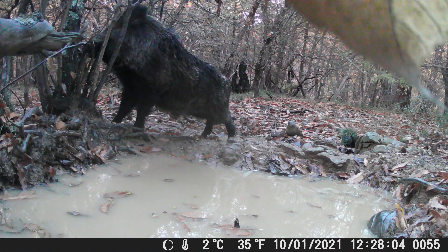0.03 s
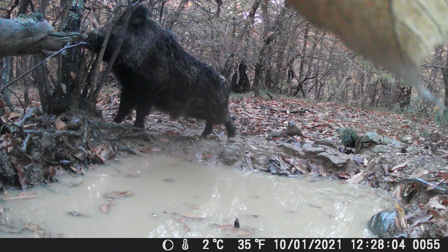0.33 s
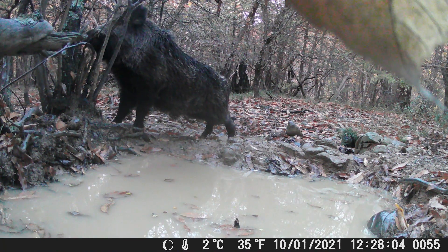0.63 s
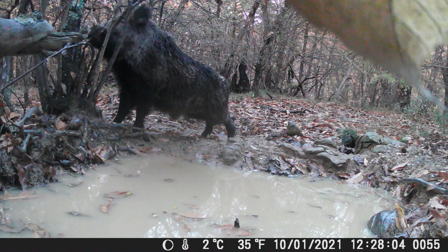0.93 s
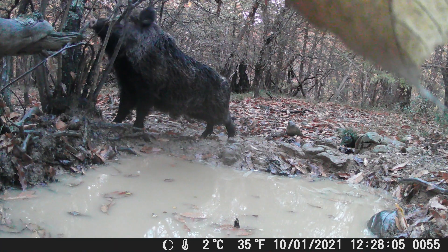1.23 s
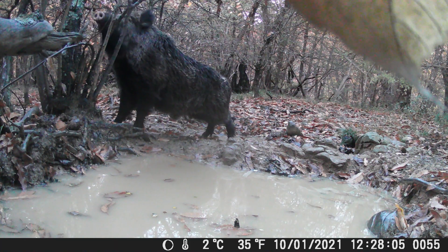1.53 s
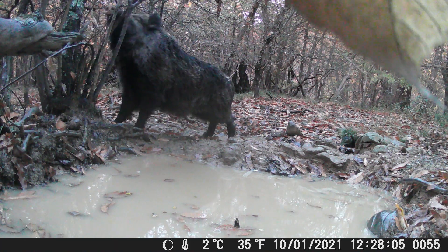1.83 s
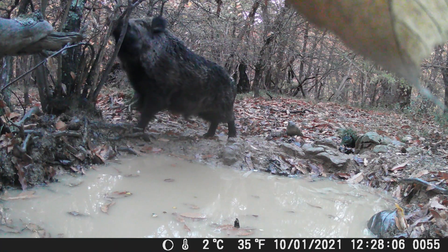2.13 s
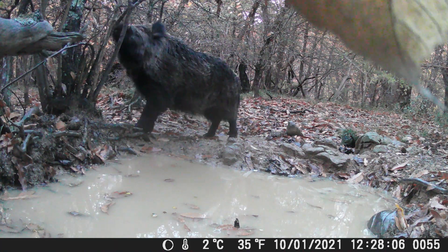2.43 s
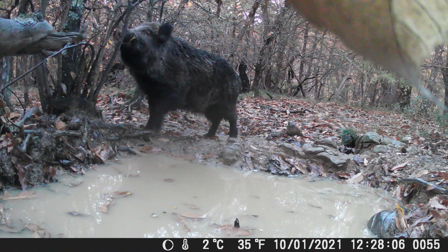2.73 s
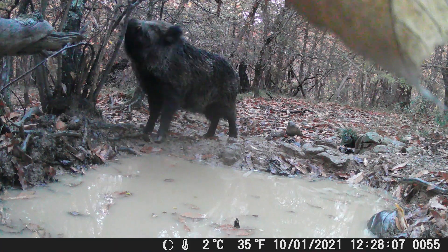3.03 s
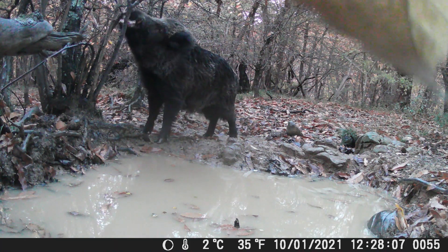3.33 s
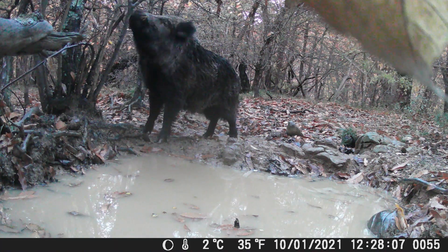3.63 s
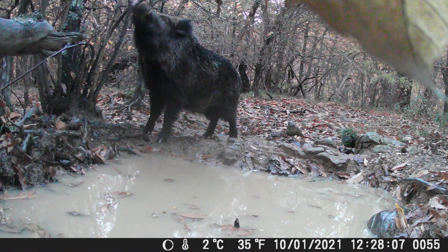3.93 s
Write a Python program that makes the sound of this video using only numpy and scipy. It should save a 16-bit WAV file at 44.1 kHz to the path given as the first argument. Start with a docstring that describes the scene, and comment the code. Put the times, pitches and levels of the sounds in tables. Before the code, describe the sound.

A hard, close knock with a brief rattle follows a boar's faint rustling and twig cracks.

```python
"""In a still wood, beside a muddy pool, a wild boar rubs its head on a trunk and shifts its feet.
Bristles catch on the bark and excite its resonances, dry leaves rustle as swarms of tiny impulses,
twigs crack and the animal's weight thuds, all over a faint hiss and rumble. Once, something snaps
hard against a mounted camera: the housing rings in its modes, rattles and shudders on its mount."""
import sys
import numpy as np
from scipy import signal
from scipy.fft import rfft, irfft
from scipy.io import wavfile
from scipy.ndimage import uniform_filter1d

SR = 44100
rng = np.random.default_rng(int(sys.argv[2]) if len(sys.argv) > 2 else 0)


def transcribe(signal):
    """Save signal, clipped to [-1, 1], as a 16-bit WAV file at the path in sys.argv[1]."""
    frames = np.atleast_2d(signal).T
    limited = np.clip(frames, -1, 1)
    pcm = np.round(limited * 32767).astype(np.int16)
    wavfile.write(sys.argv[1], SR, pcm)


N = 176400
T = np.arange(N) / SR
BUILD_CYCLES = 0.5  # time constant with which housing and mount start to vibrate

# Spectrum of crackling dry leaves. Each row: frequency in Hz, relative spectral density in dB.
LEAF_SPECTRUM = [(100, -0.5), (300, 8.5), (700, 1.5), (1500, 7), (2600, 6.5), (4000, 1), (7000, -4.5)]
# The snap on the housing, then softer bumps and rattles.
# Each row: start in seconds, peak of the contact pulse in dB, contact time in seconds.
CONTACTS = [(3.2401, -8.5, 0.00053), (3.2460, -12, 0.0038), (3.249, -30, 0.00097), (3.2520, -21, 0.0016),
            (3.273, -34.5, 0.0005), (3.2788, -26.5, 0.0036), (3.2851, -22, 0.0066), (3.315, -31.5, 0.00079),
            (3.359, -37, 0.0023), (3.452, -37, .002)]


def from_db(db):
    """Amplitude ratio of a level: 20 dB is a factor of ten."""
    return 10 ** (np.asarray(db) / 20)


def unit_rms(x):
    """Normalisation to a mean power of one."""
    return x / np.sqrt(np.mean(x ** 2) + 1e-20)


def at_hz(points, hz, column=1):
    """Interpolation of a table column on a logarithmic frequency axis."""
    table = np.array(points)
    return np.interp(np.log(hz + 1e-3), np.log(table[:, 0]), table[:, column])


def coloured(x, spectrum):
    """Filtering by multiplication in the frequency domain; the result has unit rms."""
    gain = from_db(at_hz(spectrum, np.fft.rfftfreq(N, 1 / SR)))
    return unit_rms(irfft(rfft(x) * gain, N))


def drift(per_s):
    """Slow random modulation: straight lines between Gaussian values."""
    return np.interp(T * per_s, np.arange(400), rng.standard_normal(400))


def resonate(x, hz, width_hz):
    """Forced response of a damped oscillator, with unit gain at resonance."""
    radius = np.exp(-np.pi * width_hz / SR)
    feedforward = np.array([1, 0, -1]) * (1 - radius ** 2) / 2
    feedback = [1, -2 * radius * np.cos(2 * np.pi * hz / SR), radius ** 2]
    return signal.lfilter(feedforward, feedback, x)


def lowpass(x, hz, order):
    """Maximally flat low-pass filtering: each order adds about 6 dB per octave of slope."""
    return signal.sosfilt(signal.butter(order, hz, fs=SR, output="sos"), x)


def decay(t60):
    """Exponential damping: the level falls 60 dB in t60 seconds."""
    return np.exp(-np.minimum(np.log(1000) * T / t60, 60))


def build_up(hz):
    """Onset transient: a low vibration takes longer to grow than a high one."""
    return 1 - np.exp(-T * hz / BUILD_CYCLES)


def swell(middle, half_length, db):
    """Gaussian envelope, at about half amplitude half_length seconds either side of its middle."""
    return from_db(db) * np.exp(-((T - middle) / half_length) ** 2 / np.sqrt(2))


def convolve(x, response):
    """Convolution: the output of a linear system with this impulse response."""
    return signal.fftconvolve(x, response)[:N]


def add(out, start_s, sound):
    """Superposition of a delayed sound on the mix."""
    start = int(start_s * SR)
    out[start:] += sound[:N - start]


def grains(per_s=2500, spread_db=3, max_spreads=5):
    """Shot noise: impulses of random size and sign at independent random times."""
    levels_db = spread_db * np.minimum(rng.exponential(1, N), max_spreads)
    sizes = from_db(levels_db) * rng.choice([-1, 1], N)
    return sizes * (rng.random(N) < per_s / SR)


def air():
    """Noise floor: still air and microphone hiss as Gaussian noise, strongest in the bass."""
    # Each row: frequency in Hz, relative spectral density in dB.
    spectrum = [(15, 1), (30, -1), (55, -3), (110, -7.5), (180, -11.5), (290, -13.5), (480, -22),
                (900, -27), (1300, -26), (1900, -27), (2700, -26), (4000, -33.5), (5200, -33),
                (7000, -37.5)]
    level_db = -53.5 - 0.13 * drift(per_s=7.3)
    return from_db(level_db) * coloured(rng.standard_normal(N), spectrum)


def trunk_scatter(x):
    """Diffuse reflection: the trunks add a faint, short tail to the direct sound."""
    scatter = rng.standard_normal(N) * decay(t60=0.067)
    return x + from_db(-11.5) * convolve(x, scatter / np.linalg.norm(scatter))


def leaf_litter():
    """Sparse shot noise: single leaves tick throughout, in clumps made by a drifting level."""
    # Each row: frequency in Hz, relative spectral density in dB.
    spectrum = [(300, -17), (1200, -2), (2800, 2.5), (4000, -5.5), (7000, -7.5)]
    ticks = grains(per_s=150, max_spreads=3)
    level_db = -68 - 4 * drift(per_s=14)
    return from_db(level_db) * coloured(ticks, spectrum)


def leaf_rustles():
    """Dense shot noise: the clicks of dry leaves merge into a rustle as they stir and settle."""
    # Each row: middle in seconds, half length in seconds, level in dB.
    stirs = [(0.263, 0.031, -62.5), (0.458, 0.014, -60), (0.677, 0.039, -85), (1.63, 0.027, -67),
             (1.846, 0.14, -59), (2.092, 0.01, -56.5), (2.188, 0.013, -52), (2.652, 0.0082, -52),
             (2.718, 0.04, -58.5), (2.791, 0.031, -58), (3.046, 0.021, -55), (3.272, 0.01, -49),
             (3.316, 0.003, -46.5), (3.332, 0.003, -48), (3.347, .002, -54), (3.375, 0.0081, -52.5),
             (3.407, .008, -53.5), (3.455, 0.011, -53), (3.766, 0.013, -54.5), (3.877, 0.0073, -57)]
    return sum(swell(*row) for row in stirs) * coloured(grains(), LEAF_SPECTRUM)


def twig_cracks():
    """Brittle fracture: an impulse and a burst of splinters excite one damped mode of each twig."""
    # Each row: start in seconds, level in dB, mode frequency in Hz, 60 dB decay time in seconds.
    breaks = [(0.237, -49.5, 3080, 0.025), (0.272, -53, 1440, 0.017), (.453, -40.5, 1340, 0.009),
              (.622, -47.5, 840, 0.018), (1.022, -39, 2750, .016), (1.371, -55, 4320, 0.018),
              (1.607, -44.5, 2240, 0.02), (1.742, -41, 2300, 0.0048), (1.757, -49, 2300, 0.009),
              (1.827, -42, 900, 0.012), (2.112, -41.5, 2540, 0.023), (2.178, -42, 1400, 0.01),
              (2.512, -42.5, 1470, 0.015), (2.641, -48.5, 2650, 0.018), (2.6884, -32, 1620, 0.014),
              (2.6909, -35.5, 1330, 0.024), (2.72, -53, 3980, 0.019), (3.13, -47.5, 2620, 0.024),
              (3.876, -53.5, 3930, 0.028), (3.957, -40, 2160, 0.0096)]
    splinter_decay_s = 0.0017
    out = np.zeros(N)
    for start, db, hz, t60 in breaks:
        splinters = rng.standard_normal(N) * np.exp(-np.minimum(T / splinter_decay_s, 20))
        force = from_db(-17) * splinters / np.linalg.norm(splinters)
        force[0] = 1  # the break itself
        ring = convolve(force, np.sin(2 * np.pi * hz * T) * decay(t60))
        crack = lowpass(splinters, hz=2400, order=2)
        add(out, start, from_db(db) * (ring + crack))
    return out


def resonant_swells(rows, relative_width):
    """Narrow-band noise: a random force drives one resonance a row, under a Gaussian envelope."""
    out = np.zeros(N)
    for middle, half_length, db, hz in rows:
        width = relative_width * hz
        tone = resonate(resonate(rng.standard_normal(N), hz, width), hz, width)
        local_power = uniform_filter1d(tone ** 2, int(2 * half_length * SR))
        evened = tone / np.sqrt(np.abs(local_power) + 1e-20)
        out += swell(middle, half_length, db) * evened
    return out


def creaks():
    """Lightly damped resonance gives short woody creaks and scuffs a rough pitch."""
    # Each row: middle in seconds, half length in seconds, level in dB, frequency in Hz.
    scuffs = [(.987, 0.0084, -56.5, 1360), (1.612, 0.0054, -52, 1280), (1.614, 0.013, -58.5, 2440),
              (1.755, 0.02, -54.5, 635), (2.088, 0.006, -58, 2380), (3.212, 0.014, -58, 800),
              (3.766, 0.0092, -56.5, 3020), (3.777, .011, -53.5, 950), (3.798, 0.0061, -54, 890)]
    return resonant_swells(scuffs, relative_width=0.2)


def thuds():
    """Heavily damped low resonance: the animal's shifting weight makes dull thuds."""
    # Each row: middle in seconds, half length in seconds, level in dB, frequency in Hz.
    weight_shifts = [(.957, 0.017, -48.5, 111), (1.0, 0.052, -49.5, 103), (1.14, 0.019, -50.5, 74),
                     (1.25, 0.044, -50, 91), (1.34, 0.049, -52.5, 48), (3.21, 0.015, -66, 90)]
    return resonant_swells(weight_shifts, relative_width=0.7)


def bark_rubbing():
    """Stick-slip friction: bristles catch on the bark at random and excite its resonances."""
    # Each row: middle in seconds, half length in seconds, level in dB.
    strokes = [(1.044, 0.038, -58), (1.118, 0.032, -49.5), (1.189, 0.035, -55.5), (1.265, 0.034, -62),
               (1.736, 0.038, -58)]
    # Each row: frequency in Hz, bandwidth in Hz, relative gain in dB.
    bark_resonances = [(323, 340, 4.5), (630, 157, 5.5), (1570, 470, 0), (2405, 166, 7.5), (3010, 72, -7),
                       (3600, 280, -9), (5830, 730, -11.5)]
    catches = grains()
    rasp = sum(from_db(db) * resonate(catches, hz, width) for hz, width, db in bark_resonances)
    return sum(swell(*row) for row in strokes) * unit_rms(rasp)


def coat_swish():
    """Friction noise in one high band: the coat brushes past stems."""
    # Each row: middle in seconds, half length in seconds, level in dB.
    passes = [(1.185, 0.094, -63.5), (1.79, 0.17, -68)]
    hz, width_hz = 6180, 840
    swish = resonate(resonate(grains(), hz, width_hz), hz, width_hz)
    return sum(swell(*row) for row in passes) * unit_rms(swish)


def mount_shudder():
    """Modal overlap: after the snap the mount shakes as decaying noise bands, longest in the bass."""
    # Each row: frequency in Hz, relative spectral density in dB, 60 dB decay time in seconds.
    spectrum = [(25, 12, 0.24), (72, -1.5, 0.96), (147, 0, 0.53), (350, 8, 0.11), (690, -20, 0.48),
                (1400, -5.5, 0.073), (2800, -32, 0.18), (4200, -44, .24), (6900, -34, 0.24)]
    snap_start = CONTACTS[0][0]
    out, shake, power = np.zeros(N), 0, 0
    edges_hz = np.geomspace(20, 8000, 14)
    for low, high in zip(edges_hz, edges_hz[1:]):
        hz = np.sqrt(low * high)
        bandpass = signal.butter(2, [low, high], "band", fs=SR, output="sos")
        band = signal.sosfilt(bandpass, rng.standard_normal(N + SR))[SR:]  # one second to settle
        gain = from_db(at_hz(spectrum, hz)) * np.sqrt(high - low)
        t60 = at_hz(spectrum, hz, column=2)
        shake += gain * unit_rms(band) * decay(t60) * build_up(hz)
        power += gain ** 2
    add(out, snap_start, from_db(-21) * shake / np.sqrt(power))
    return out


def housing_snap():
    """Impact excitation: each contact rings the housing; long, soft ones reach only the low modes."""
    # Each row: frequency in Hz, relative level in dB, 60 dB decay time in seconds.
    housing_modes = [(31.48, -19.5, 0.6), (57.8, -28, 0.85), (114, -11, .22), (142, -20, 0.27),
                     (195, -12, 0.18), (226.4, -18.5, 0.17), (333, -13.5, 0.11), (366, -11, 0.091),
                     (437, -26, 0.068), (605, -13.5, 0.039), (689, -18.5, 0.098), (938, -32.5, .12),
                     (1006, -24, 0.064), (1204, -11.5, 0.049), (1830, -18, 0.051), (2620, 4, .018),
                     (4100, -27, 0.016)]
    modes = np.array([(-1) ** k * from_db(db) * np.sin(2 * np.pi * hz * T) * decay(t60) * build_up(hz)
                      for k, (hz, db, t60) in enumerate(housing_modes)])
    snap_contact_s = CONTACTS[0][2]
    out = np.zeros(N)
    for start, db, contact_s in CONTACTS:
        pulse = np.sin(np.pi * np.minimum(T / contact_s, 1)) ** 2
        mode_gains = from_db(rng.normal(0, 0.89, len(modes)))
        ring = convolve(pulse / pulse.sum(), mode_gains @ modes)
        crunch = coloured(rng.standard_normal(N), LEAF_SPECTRUM) * decay(t60=0.024)
        hardness = snap_contact_s / contact_s
        add(out, start, from_db(db) * (pulse + ring + from_db(-8) * hardness * crunch))
    return out


def scene():
    """Superposition: boar and leaves with their scatter, the close snap and shudder, and the air."""
    boar = twig_cracks() + leaf_rustles() + bark_rubbing() + coat_swish() + creaks() + thuds()
    return (trunk_scatter(boar + leaf_litter()) + housing_snap() + mount_shudder() + air())[None]


def record(dry):
    """Band limiting: a dull microphone is flat to an edge, then has a weak shelf and a steep cutoff."""
    edge_hz, shelf_db, cutoff_hz = 4275, -14.5, 7700
    passband = lowpass(dry, edge_hz, order=14)
    treble = signal.sosfilt(signal.butter(4, edge_hz * 1.39, "high", fs=SR, output="sos"), dry)
    return lowpass(passband + from_db(shelf_db) * treble, cutoff_hz, order=28)


dry = scene()
out = record(dry)
transcribe(out)
```